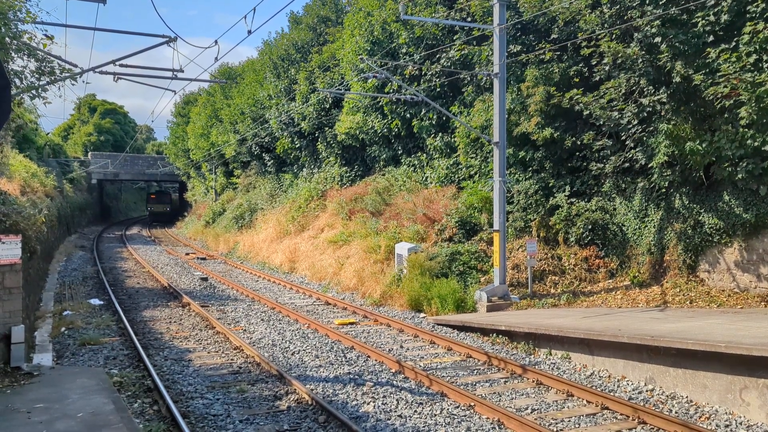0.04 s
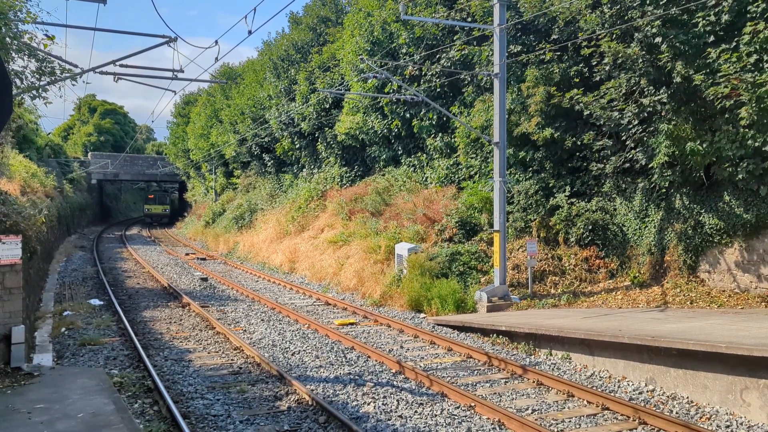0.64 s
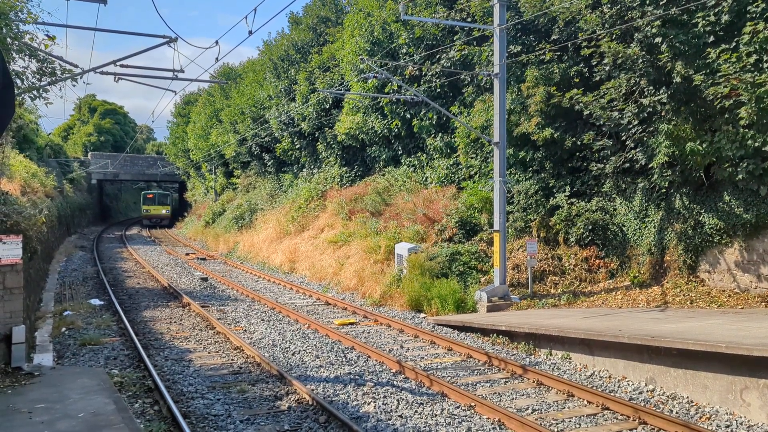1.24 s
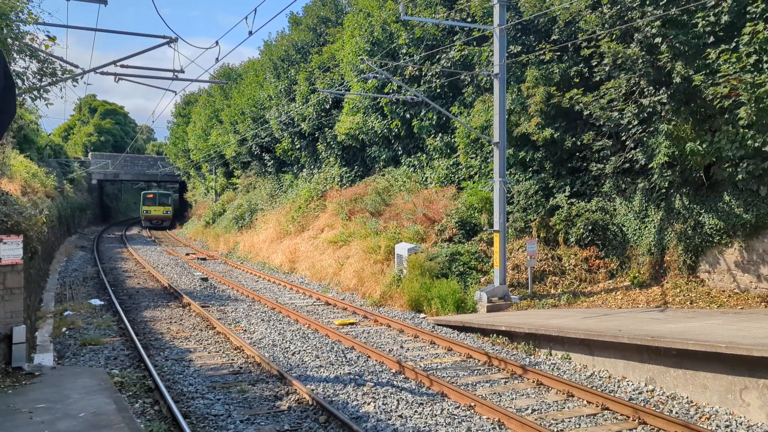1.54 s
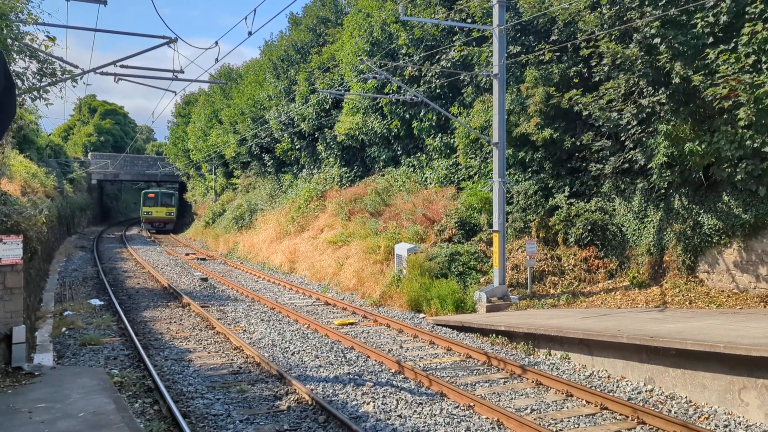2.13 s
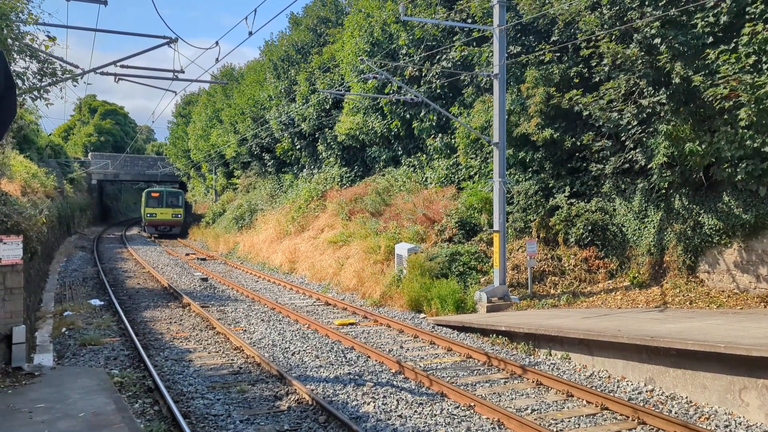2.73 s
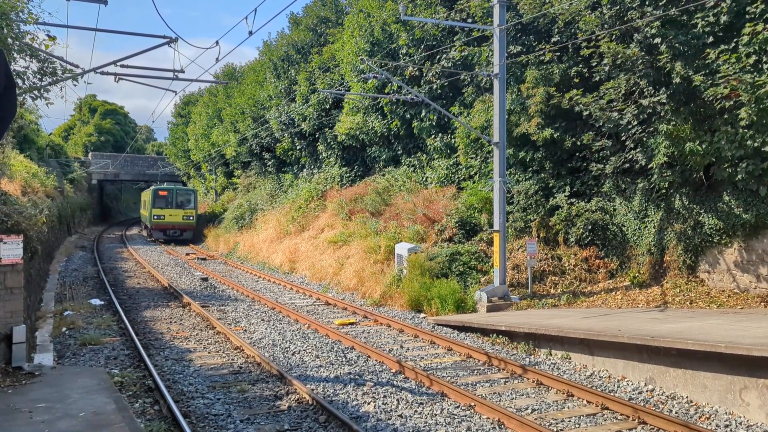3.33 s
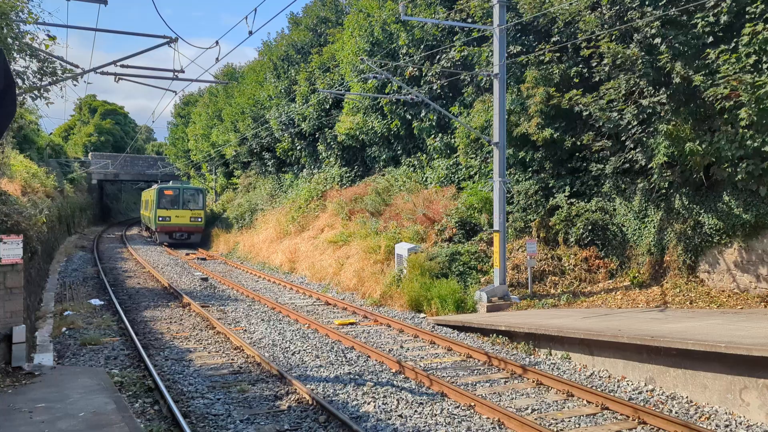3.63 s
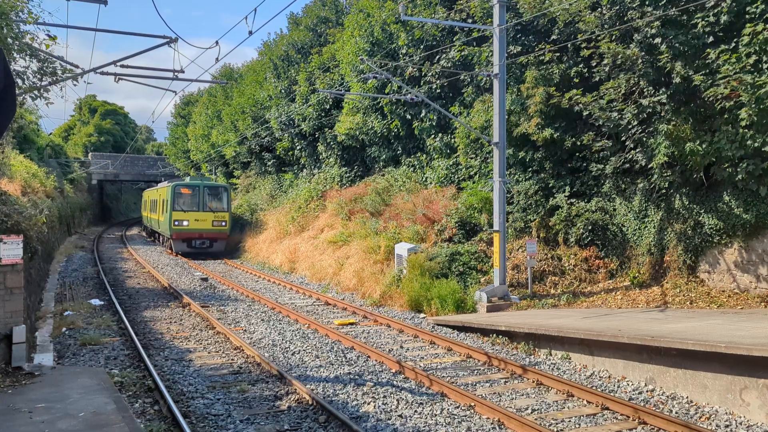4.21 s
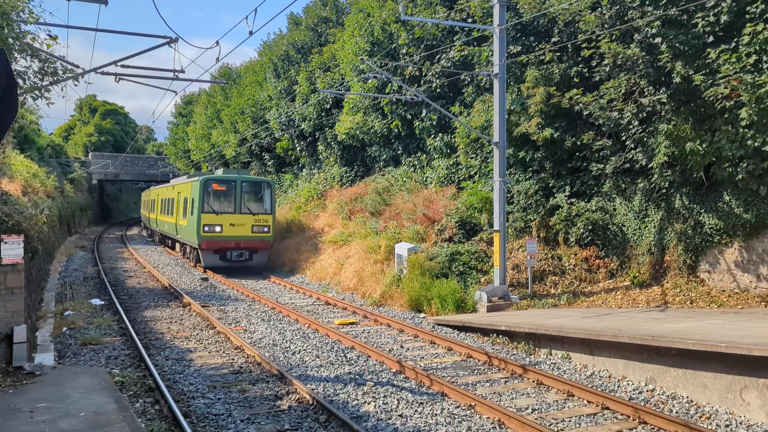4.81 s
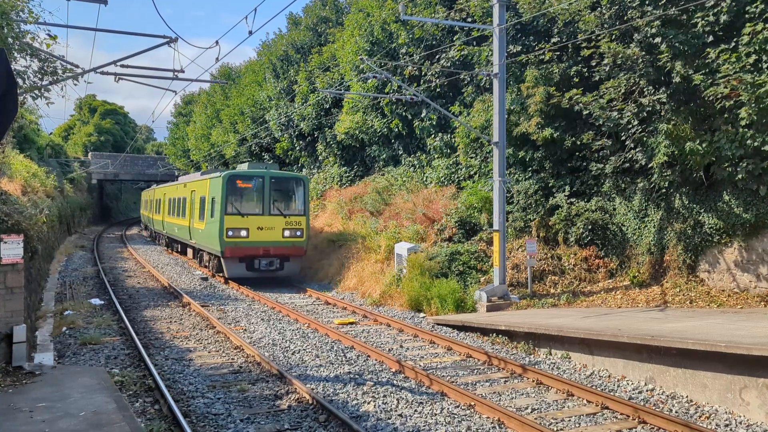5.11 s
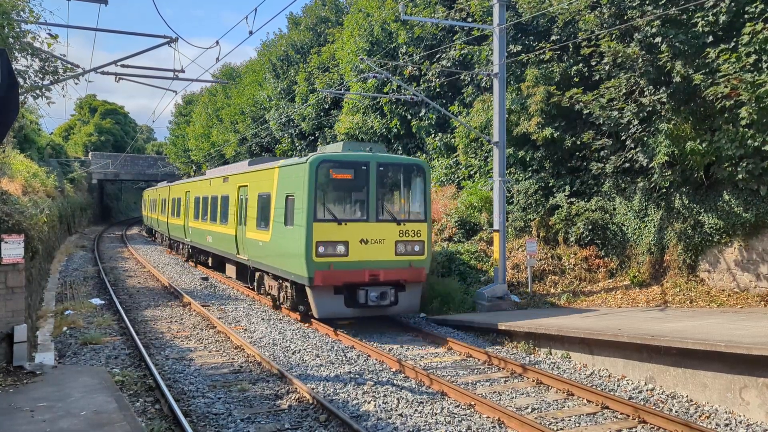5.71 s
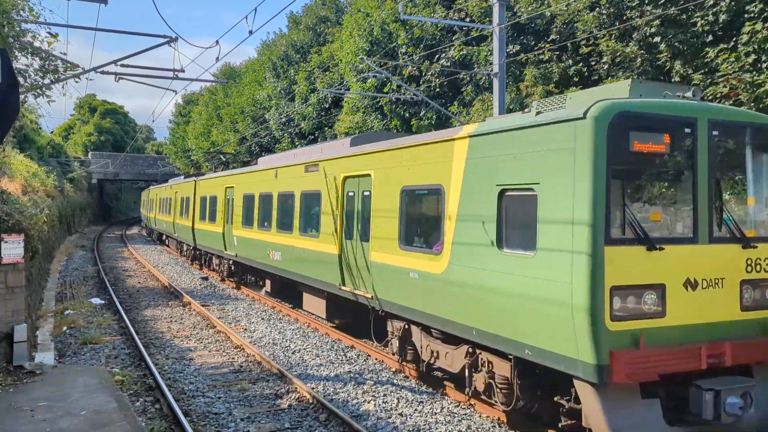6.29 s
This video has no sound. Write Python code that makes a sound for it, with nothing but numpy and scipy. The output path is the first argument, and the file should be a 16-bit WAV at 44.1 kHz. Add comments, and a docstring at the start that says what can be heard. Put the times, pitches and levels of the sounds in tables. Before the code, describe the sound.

An electric train approaches on a curve, rumbling louder as its wheels hiss, squeal and clank over rail joints.

```python
"""Wheel flanges grind on a curved rail as an electric train comes from under a bridge towards a platform.
Stick-slip friction excites the rail's modes in bursts of bright, ringing hiss, and single wheels squeal.
Rough track makes the wheels roll and rumble, impacts at the rail joints ring wheels and bogies, and the
motors whine. The sound grows as the distance falls, arriving directly and scattered by the cutting.
At first a light breeze buffets the two ports of the microphone."""
import sys
import numpy as np
from scipy import signal
from scipy.fft import rfft, irfft, next_fast_len
from scipy.io import wavfile
from scipy.ndimage import uniform_filter1d

SR = 44100
rng = np.random.default_rng(int(sys.argv[2]) if len(sys.argv) > 2 else 0)


def generate_wav(sig):
    """Save sig (samples, or channels by samples) to the path in sys.argv[1] as 16-bit PCM at SR."""
    pcm = np.round(np.clip(np.atleast_2d(sig).T, -1, 1) * 32767).astype(np.int16)
    wavfile.write(sys.argv[1], SR, pcm)


N = 280035
T = np.arange(N) / SR
FFT_SIZE = next_fast_len(N + 8192, real=True)
HZ = np.maximum(np.arange(FFT_SIZE // 2 + 1) * SR / FFT_SIZE, 1)
SIDES = np.array([[1], [-1]])  # left, right


def undb(db):
    """Amplitude ratio of a level in decibels."""
    return 10 ** (np.asarray(db) / 20)


def curve(rows, column=1):
    """Linear interpolation of one table column over time."""
    rows = np.asarray(rows)
    return np.interp(T, rows[:, 0], rows[:, column])


def unit(x):
    """Normalisation to an rms of 1."""
    return x / np.sqrt(np.mean(x ** 2))


def colour(points):
    """Spectral envelope through (f/Hz, level/dB) points, falling 40 dB per octave beyond the ends."""
    hz, db = np.transpose(points)
    octaves_outside = np.abs(np.log2(HZ / np.clip(HZ, hz.min(), hz.max())))
    return undb(np.interp(np.log(HZ), np.log(hz), db) - 40 * octaves_outside)


def resonances(modes):
    """Modal superposition: damped resonators of alternating sign, rolled off outside their range."""
    response = sum((-1) ** k * undb(db) / (1 + 1j * (HZ / hz - hz / HZ) * hz / width)
                   for k, (hz, width, db) in enumerate(modes))
    low_hz, high_hz = modes[0][0] - modes[0][1], modes[-1][0] + modes[-1][1]
    return response * colour([(low_hz, 0), (high_hz, 0)])


def filtered(x, response):
    """Linear filtering: the spectrum is multiplied by a frequency response."""
    return irfft(rfft(x, FFT_SIZE) * response, FFT_SIZE)[..., :N]


def wander(rate_hz):
    """Low-pass random modulation: held values, smoothed twice, with a spread near 1."""
    hold = max(int(SR / rate_hz), 1)
    steps = np.repeat(rng.standard_normal(N)[:N // hold + 1], hold)
    return 1.3 * uniform_filter1d(uniform_filter1d(steps, hold), hold)[:N]


def envelope(start, attack_s, length_s, release_s):
    """Rounded onset, then exponential decay once the length is over."""
    age = T - start
    rise = np.sin(np.pi / 2 * np.clip(age / max(attack_s, .001), 0, 1)) ** 2
    return rise * np.exp(-np.maximum(age - length_s, 0) / release_s)


def friction(rate_hz, grain_db):
    """Stick-slip friction: the contact force comes in brief, uneven grains."""
    return unit(undb(grain_db * np.clip(wander(rate_hz), -2.5, 2.5)))


def rail_ripple(spacing_hz, depth_db):
    """Modal overlap: the many close modes of a long rail put a fine, uneven ripple on its response."""
    grid = np.arange(0, SR / 2, spacing_hz)
    return undb(depth_db * np.interp(HZ, grid, rng.standard_normal(N)[:len(grid)]))


SPEED_M_S, ABREAST_S, NEAREST_M = 12.34, 6.387, 9.1


def distance(t):
    """Range in metres of the leading wheels, in uniform motion towards their closest approach."""
    return np.hypot(SPEED_M_S * (ABREAST_S - t), NEAREST_M)


def approach(near_db, doubling_db):
    """Attenuation with range: the gain loses doubling_db for each doubling of the distance."""
    return undb(near_db - doubling_db * np.log2(distance(T) / NEAREST_M))


def shimmer(x, depth_db):
    """Multipath interference from moving wheels: narrow bands swell and fade independently."""
    cells = signal.stft(x, nperseg=1024)[2]
    fading = rng.standard_normal(cells.shape[1:])
    fading = uniform_filter1d(fading, size=2, axis=0)  # across frequency
    fading = unit(uniform_filter1d(fading, size=7, axis=1))  # across time
    faded = cells * undb(depth_db * np.clip(fading, -2, 2))
    return unit(signal.istft(faded)[1][:, :N])


PORT_SPACING_M, PORT_LAG_MS, SOUND_M_S = 0.145, .16, 343


def from_left():
    """Path difference: direct sound reaches the left port before the right."""
    return np.exp(1j * np.pi * HZ * SIDES * PORT_LAG_MS / 1000)


# Sound arriving straight from the train: f/Hz, fraction of the power
DIRECT_SHARE = [(500, 0.54), (2000, 0.24), (7000, 0.14)]


def radiate(response, force=1, shimmer_db=None):
    """Forced vibration: a random force drives a body, heard as a direct plus a diffuse field."""
    paths = rng.standard_normal((3, N))
    if shimmer_db is not None:
        paths = shimmer(paths, shimmer_db)
    direct, mid, side = rfft(paths * force, FFT_SIZE)
    coherence = np.sinc(2 * HZ * PORT_SPACING_M / SOUND_M_S)
    diffuse = np.sqrt((1 + coherence) / 2) * mid + SIDES * np.sqrt((1 - coherence) / 2) * side
    share = np.interp(HZ, *np.transpose(DIRECT_SHARE))
    ports = np.sqrt(share) * direct * from_left() + np.sqrt(1 - share) * diffuse
    response_rms = np.sqrt(np.mean(np.abs(response) ** 2))
    return irfft(ports * response / response_rms, FFT_SIZE)[:, :N]


# Bass spectrum of eddies and of the shaking ground: f/Hz, relative level/dB
BASS_SPECTRUM = [(20, -36), (35, -43), (49, 8), (62, 1.5), (100, 1.5), (140, -11), (260, -28)]
# Gusts: start t/s, attack/s, length/s, left level/dB, right level/dB
GUSTS = [(0, 0.0095, 0.23, -44, -51), (0.31, .04, 0.045, -53, -48), (1.096, 0.31, 0.555, -49, -42.5)]


def breeze():
    """Turbulent pressure: eddies buffet each port independently, gust by gust."""
    eddies = unit(filtered(rng.standard_normal((2, N)), colour(BASS_SPECTRUM)))
    return eddies * sum(envelope(start, attack, length, release_s=0.075) * undb([[left_db], [right_db]])
                        for start, attack, length, left_db, right_db in GUSTS)


# Shaking from the track: t/s, bogie level/dB, ground level/dB, car body level/dB
RUMBLE_LEVELS = [(0, -56.5, -52, -83), (1.3, -51, -57, -65), (3.3, -48, -50.5, -59.5),
                 (4.3, -43, -42.5, -65), (4.95, -39, -36.5, -47), (5.35, -37, -36, -38),
                 (5.95, -31.5, -33.5, -30.5), (6.12, -35.5, -35.5, -37.5), (6.35, -29.5, -35, -31)]
# Bogie spectrum: f/Hz, relative level/dB
BOGIE_SPECTRUM = [(60, -16.5), (110, 0.5), (170, 3), (230, -7), (330, -3), (440, -11), (510, -8),
                  (760, -7.5), (880, -15.5), (1030, -10), (1300, -17.5), (1650, -23), (3000, -22)]
# Car body modes: f/Hz, bandwidth/Hz, relative level/dB
BODY_MODES = [(204.2, 12, 3), (238.5, 17, 1.5), (320, 41, -6.5)]


def rumble():
    """Structure-borne sound: rough track shakes the bogies, the ground and the droning car body."""
    roughness = friction(rate_hz=25, grain_db=0.6)
    bogies = radiate(colour(BOGIE_SPECTRUM), roughness, shimmer_db=1.5) * undb(curve(RUMBLE_LEVELS))
    ground = radiate(colour(BASS_SPECTRUM)) * undb(curve(RUMBLE_LEVELS, column=2))
    body = radiate(resonances(BODY_MODES)) * undb(curve(RUMBLE_LEVELS, column=3))
    return bogies + body + ground


def tone(hz, width_hz):
    """Spectral broadening: many paths smear a tone into a narrow band, differently at each port."""
    phasor = np.array([wander(2 * width_hz) + 1j * wander(2 * width_hz) for _ in range(2)])
    carrier = np.exp(2j * np.pi * np.cumsum(hz) / SR)
    return unit(np.real(phasor * carrier))


# Motor whine: t/s, f/Hz, level/dB
MOTOR_WHINE = [(0, 3030, -78), (1.6, 3015, -62), (1.75, 3050, -55), (2.7, 3200, -57), (3.4, 3283, -57.5),
               (4.4, 3400, -52), (6.35, 3410, -46)]
# Singing note of the running gear: t/s, level/dB
GEAR_LEVELS = [(0, -65), (1.2, -60), (4.0, -56.5), (4.9, -44.5), (6.35, -49)]


def motors():
    """Tonal machine noise: a slowly climbing whine over a lower resonance of the running gear."""
    pitch = curve(MOTOR_WHINE)
    band = tone(pitch, width_hz=160) * undb(-4)
    core = tone(pitch * 1.01, width_hz=50) * undb(-6)
    gear = radiate(resonances([(1450, 58, 0)]) * colour([(1250, 12), (1440, -3), (1540, -21)]))
    return (band + core) * undb(curve(MOTOR_WHINE, column=2)) + gear * undb(curve(GEAR_LEVELS))


# Wheels meeting rail joints: t/s, peak level/dB (not played), thud level/dB, clank level/dB
JOINT_IMPACTS = [(3.573, -35, -41, -64), (3.926, -36, -48, -46.5), (3.989, -27, -32.5, -45),
                 (4.165, -31, -33.5, -48.5), (4.352, -22, -36, -36.5), (4.411, -17, -22, -34),
                 (4.575, -21, -29.5, -37.5), (4.844, -18, -29, -42), (5.016, -28, -34, -41.5),
                 (5.468, -20, -28, -41), (5.644, -24, -29.5, -43), (5.908, -21, -30.5, -59),
                 (5.97, -27, -27.5, -50), (6.034, -18, -29, -37.5), (6.309, -21, -32, -47)]
THUD, CLANK = 2, 3  # columns


def blows(column, lead_s, rise_s, fall_s, echo_db, echo_s):
    """Impact envelopes add in power: each builds, falls fast and leaves a tail from the banks."""
    power = np.zeros(N)
    for impact in JOINT_IMPACTS:
        age = np.maximum(T - impact[0] + lead_s, 0)
        rise = 1 - np.exp(-age / rise_s)
        fade = np.exp(-age / fall_s) + undb(echo_db) * np.exp(-age / echo_s)
        power += (undb(impact[column]) * rise * fade) ** 2
    return np.sqrt(power)


def strikes(column, modes, delay_s):
    """Impulse response: hard contact with the far rail end rings all the modes at once."""
    force = np.zeros(N)
    for impact in JOINT_IMPACTS:
        force[int((impact[0] + delay_s) * SR)] = undb(impact[column])
    response = resonances(modes)
    return filtered(force, response * from_left()) / np.abs(irfft(response)).max()


# Modes of a struck bogie (thud) and wheel (clank): f/Hz, bandwidth/Hz, relative level/dB
THUD_MODES = [(130, 45, -4), (275.4, 26, -2.5), (336, 37.6, -1), (497, 39, -6), (604, 69, -11.5)]
CLANK_MODES = [(779, 80, 6.5), (1020, 53, 8.5), (1150, 110, 2), (1300, 310, -0.5)]


def joints():
    """Impact excitation: a wheel drops into a joint, the bogie thuds, the wheel clanks, both rattle."""
    thud_force = blows(THUD, lead_s=0.0049, rise_s=0.0034, fall_s=0.021, echo_db=-12.5, echo_s=0.15)
    clank_force = blows(CLANK, lead_s=0.006, rise_s=0.0011, fall_s=0.02, echo_db=-7, echo_s=0.11)
    thud = radiate(resonances(THUD_MODES), thud_force)
    clank = radiate(resonances(CLANK_MODES), clank_force)
    knock = strikes(THUD, THUD_MODES, delay_s=0.00433) + strikes(CLANK, CLANK_MODES, delay_s=0)
    return thud * undb(1.5) + clank * undb(2) + knock * undb(-2)


# Sideways slides: peak t/s, width/s, tread level/dB, scraping edge level/dB
SLIDES = [(.85, 0.18, -57, -54.5), (2.05, 0.13, -54.5, -53), (3.7, 0.12, -57, -48),
          (4.04, 0.073, -42, -39.5), (4.42, 0.044, -41.5, -64), (4.75, 0.15, -41, -35),
          (5.001, 0.21, -46, -36.5), (5.54, 0.098, -33.5, -30), (5.92, 0.053, -54, -47),
          (6.1, 0.025, -29.5, -24.5), (6.35, .04, -27, -23.5)]


def swishes():
    """Lateral sliding: the gains of tread and edge swell and fade symmetrically about each peak."""
    power = np.zeros((2, N))
    for peak, width, tread_db, edge_db in SLIDES:
        swell = 1 / np.cosh(np.clip(1.9 * (T - peak) / width, -20, 20))
        power += (undb([[tread_db], [edge_db]]) * swell) ** 2
    return np.sqrt(power)


def creep_gain(tight_s=3.9, entry_s=0.18, easy_curve_db=-6.5):
    """Lateral creep: the steady scraping grows once the front bogie enters the tight curve."""
    entered = np.clip((T - tight_s) / entry_s, 0, 1)
    return approach(near_db=-33, doubling_db=8.77) * undb(easy_curve_db * (1 - entered))


# Spectra of rolling treads and of sideways creep: f/Hz, relative level/dB
TREAD_SPECTRUM = [(500, 1), (1000, -11), (1650, -4), (2000, -1.5), (2550, 3.5), (2850, -8), (3200, -11.5),
                  (3700, -4), (6000, -34)]
CREEP_SPECTRUM = [(2000, -33), (3100, -4.5), (5200, -4.5), (5700, -9), (6500, -6), (9000, -17)]
# Modes of rolling and of scraped wheels: f/Hz, bandwidth/Hz, relative level/dB
ROLL_MODES = [(2204, 220, -3.5), (2407, 130, -0.5), (3050, 200, -2)]
SCRAPE_MODES = [(3600, 570, -0.5), (3964, 21, 10), (4180, 59, -8), (4480, 110, -6), (4570, 54, -8.5),
                (5185, 175, 1.5)]


def rolling(tread_swish, edge_swish):
    """Rolling noise: tread contact rings the wheels, and sideways creep excites their higher modes."""
    rail = rail_ripple(spacing_hz=24, depth_db=1)
    tread = radiate(colour(TREAD_SPECTRUM) * rail, friction(rate_hz=60, grain_db=1.03), shimmer_db=3.5)
    wheels = radiate(resonances(ROLL_MODES) * rail, shimmer_db=2) * undb(-2.5)
    creep_force = friction(rate_hz=250, grain_db=-0.5)
    creep = radiate(colour(CREEP_SPECTRUM) * rail, creep_force, shimmer_db=6.5) * undb(-0.5)
    scrape = radiate(resonances(SCRAPE_MODES) * rail, shimmer_db=1.5) * undb(-5)
    tread_gain = np.hypot(approach(near_db=-32.5, doubling_db=9.59), tread_swish)
    edge_gain = np.hypot(creep_gain(), edge_swish)
    return (tread + wheels) * tread_gain + (creep + scrape) * edge_gain


# Squeals of single wheels, and brief pulses of the 1.4 kHz running-gear note: start t/s, length/s, f/Hz,
# bandwidth/Hz, level/dB
SQUEALS = [(0, 0.23, 13000, 1400, -62), (0.46, 0.12, 3060, 130, -58), (0.469, 0.19, 3990, 60, -59),
           (0.49, 0.66, 6950, 180, -66.5), (0.518, 0.78, 13300, 1200, -69), (0.723, 0.47, 4000, 45, -61),
           (.92, 0.48, 6500, 200, -64.5), (1.634, .06, 1436, 70, -53), (1.832, .06, 1420, 70, -53.5),
           (1.72, 0.45, 7000, 259, -63), (1.717, .47, 4030, 60, -63.5), (2.03, 0.14, 1406, 110, -52),
           (2.33, .35, 14300, 1500, -69), (3.487, .1, 1450, 60, -51), (4.688, 0.44, 4000, 160, -36.5),
           (4.685, 0.26, 5020, 200, -36), (4.708, 0.32, 3020, 260, -40.5), (4.94, .16, 4017, 75.1, -37)]


def squeals():
    """Curve squeal: one wheel catches on the rail, sings in a narrow band, then lets go; the 1.4 kHz note of
    the running gear swells in brief pulses the same way."""
    sound = 0
    for start, length, hz, width, db in SQUEALS:
        progress = np.clip((T - start) / length, 0, 1)
        swell = np.minimum(progress / 0.029, 1) * (1 - progress ** 2)
        sound += tone(np.full(N, hz), width) * swell * undb(db)
    return sound


# Flange bites: start t/s, attack/s, length/s, lower band level/dB, upper band level/dB,
# ring over hiss/dB, upper band left minus right/dB
FLANGE_BITES = [(0, 0.0057, 0.17, -68.5, -72, -13, 8), (.1, .15, 0.22, -75, -78, -10, 6),
                (.46, 0.072, 0.6, -86, -78, -10, 7), (1.622, 0.24, 0.33, -67, -65.5, -8, 4),
                (2.31, .05, 0.77, -71, -76, -4, -2), (3.372, 0.2, 0.41, -51.5, -50, -18, -3),
                (3.903, 0.036, 0.13, -39.5, -39.5, -2, -2), (3.985, 0.086, 0.058, -22, -43, 11, 0),
                (4.12, 0.18, 0.21, -37, -30, -7, -1.5), (4.338, 0.029, 0.042, -34.5, -53, 1, 2),
                (4.544, .02, .1, -32.5, -24.5, 0, 1), (4.61, .03, 0.047, -19, -22.5, 6.5, 0),
                (4.659, 0.034, 0.14, -22.5, -21, 2, 0), (4.955, .08, 0.12, -40, -41, 3, 0),
                (5.095, 0.064, 0.072, -21.5, -21.5, -1, -1), (5.191, 0.07, 0.2, -24.5, -21.5, -4, 0.5),
                (5.431, 0.026, 0.15, -15, -23.5, -0.5, -1), (5.464, 0.067, 0.52, -22.5, -20.5, -22, 0),
                (5.862, .045, 0.063, -15.5, -21, -2, 0), (5.99, 0.082, .34, -13.5, -30, -3.5, -1),
                (6.122, 0.2, 0.18, -27, -18, -6, 0.5)]


def bites(near_release_s=0.044, release_s_per_m=0.00097):
    """Incoherent addition: bites sum in power to gains for lower hiss, lower ring and upper band."""
    hiss, ring, upper = np.zeros(N), np.zeros(N), np.zeros((2, N))
    for start, attack, length, lower_db, upper_db, ring_db, pan_db in FLANGE_BITES:
        # From afar, the echo of the cutting draws out the decay.
        release = near_release_s + release_s_per_m * (distance(start) - NEAREST_M)
        power = envelope(start, attack, length, release) ** 2
        lower_power = power * undb(lower_db) ** 2
        hiss_share = 1 / (1 + undb(ring_db) ** 2)
        hiss += lower_power * hiss_share
        ring += lower_power * (1 - hiss_share)
        upper += power * undb(upper_db + SIDES * pan_db / 2) ** 2
    return np.sqrt(hiss), np.sqrt(ring), np.sqrt(upper)


# Flange hiss, lower and upper band: f/Hz, relative level/dB
GRIND_SPECTRUM = [(5000, -22), (5850, -16.5), (6250, -7.5), (7300, -8), (7800, -4), (8500, -2),
                  (8900, -5.5), (9400, -6), (9900, -12.5), (11500, -13.5)]
SIZZLE_SPECTRUM = [(8500, -46), (10000, -16.5), (10850, 2.5), (11700, 2.5), (12600, -2.5), (13350, -2.5),
                   (14000, -2.5), (15000, -9), (16000, -22)]
# Rail modes, lower and upper band: f/Hz, bandwidth/Hz, relative level/dB
LOWER_RAIL_MODES = [(6240, 16, -24), (6680, 10, 0), (7735, 82, 5.5), (7950, 110, 1), (8270, 70, 6.5),
                    (8500, 25, 6), (8444, 120, 10), (7950, 23, -11)]
UPPER_RAIL_MODES = [(10940, 30, -9), (10700, 31, -10), (11930, 14, 7), (11300, 25, -3), (12100, 30, -10),
                    (12600, 25, 9), (12700, 40, -7.5), (14416, 25, -7)]


def flanges(edge_swish):
    """Friction-induced vibration: flanges rub and bite, hissing and ringing two groups of rail modes."""
    slips = friction(rate_hz=700, grain_db=1.5)
    hiss_gain, ring_gain, upper_gain = bites()
    lower_rub = np.hypot(approach(near_db=-24.5, doubling_db=20.7), edge_swish * undb(-4))
    upper_rub = np.hypot(approach(near_db=-42, doubling_db=19), edge_swish * undb(-11))
    rail = rail_ripple(spacing_hz=24, depth_db=2.2)
    grind = radiate(colour(GRIND_SPECTRUM) * rail, slips, shimmer_db=4.5)
    lower_ring = radiate(resonances(LOWER_RAIL_MODES), slips)
    sizzle = radiate(colour(SIZZLE_SPECTRUM) * rail, friction(rate_hz=600, grain_db=1), shimmer_db=5)
    upper_ring = radiate(resonances(UPPER_RAIL_MODES))
    lower = grind * np.hypot(hiss_gain, lower_rub) + lower_ring * ring_gain
    upper = sizzle * undb(-0.46) + upper_ring * undb(-11)
    return lower + upper * np.hypot(upper_gain, upper_rub)


def scene():
    """Superposition: the sources of the approaching train and the breeze add in pressure."""
    tread_swish, edge_swish = swishes()
    wheel_noise = rumble() + rolling(tread_swish, edge_swish) + flanges(edge_swish) + squeals()
    return wheel_noise + motors() + joints() + breeze()


# Imbalance of the microphone ports: f/Hz, left minus right level/dB
PORT_BALANCE = [(700, 0), (2300, 2.5), (4400, -6), (8100, -3.5), (10500, 1), (12500, 7.5), (15000, -3)]
CUTOFF_HZ = 15800


def record(dry):
    """Transducer response: each port colours the treble; the signal is clipped, then low-passed."""
    hz, db = np.transpose(PORT_BALANCE)
    tilt = undb(SIDES * np.interp(HZ, hz, db) / 2)
    tilt /= np.sqrt(np.mean(tilt ** 2, axis=0))
    clipped = np.clip(filtered(dry, tilt), -1, 1)
    return signal.sosfilt(signal.ellip(10, .2, 80, CUTOFF_HZ, fs=SR, output="sos"), clipped)


dry = scene()
out = record(dry)
generate_wav(out)
```